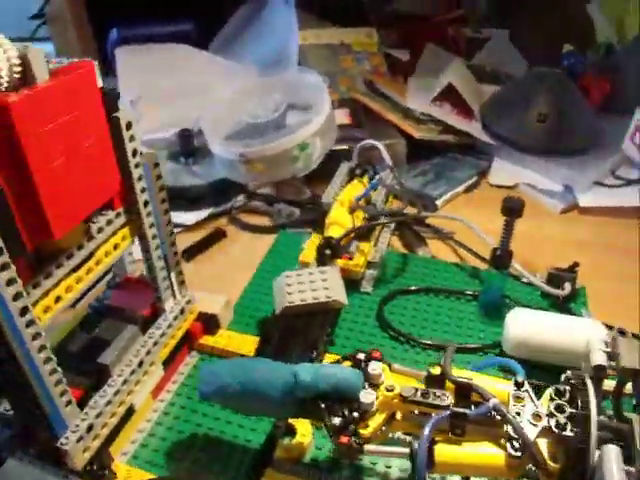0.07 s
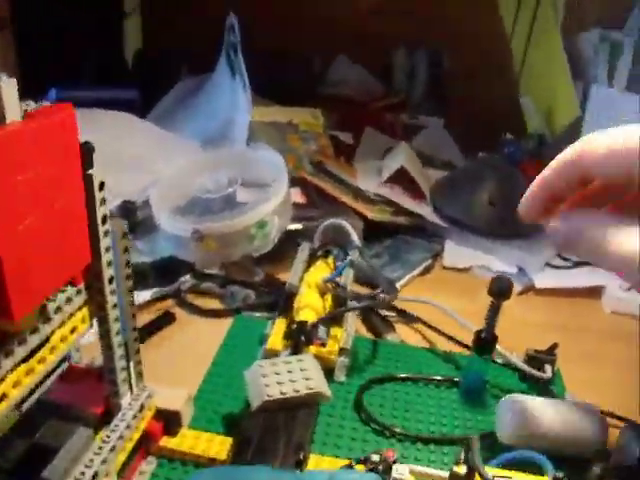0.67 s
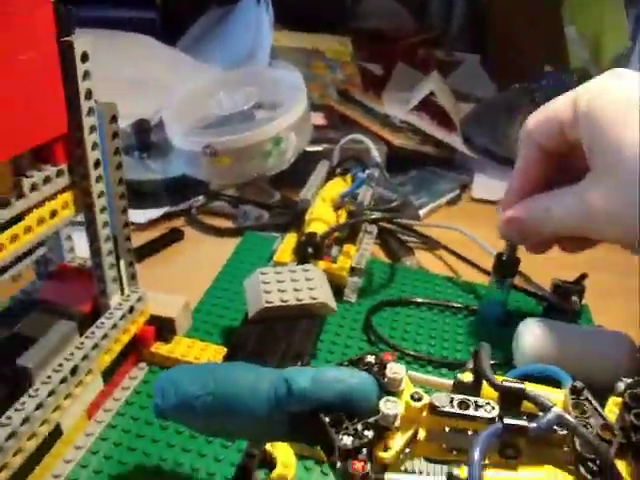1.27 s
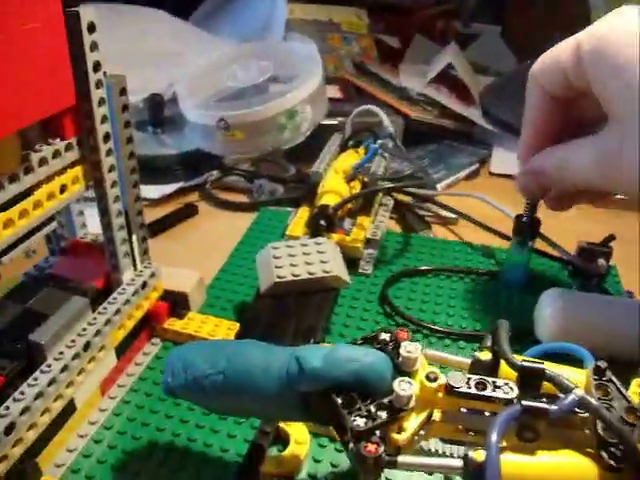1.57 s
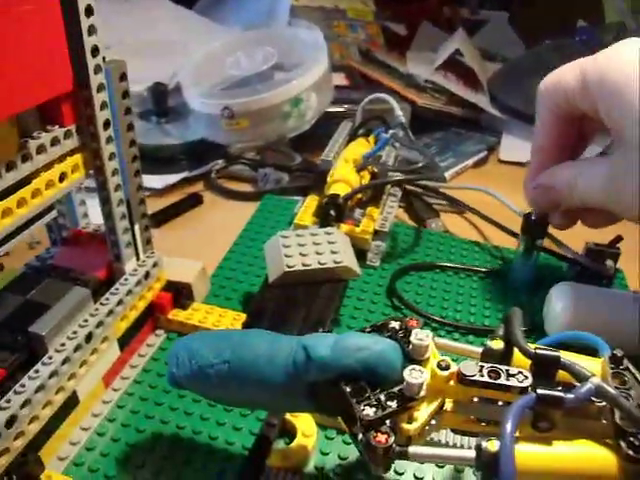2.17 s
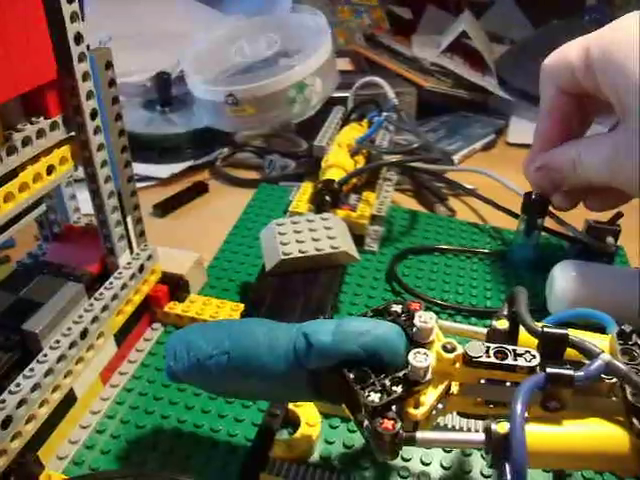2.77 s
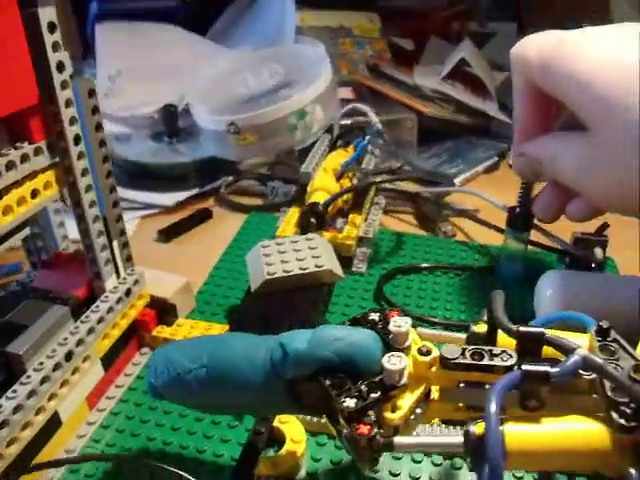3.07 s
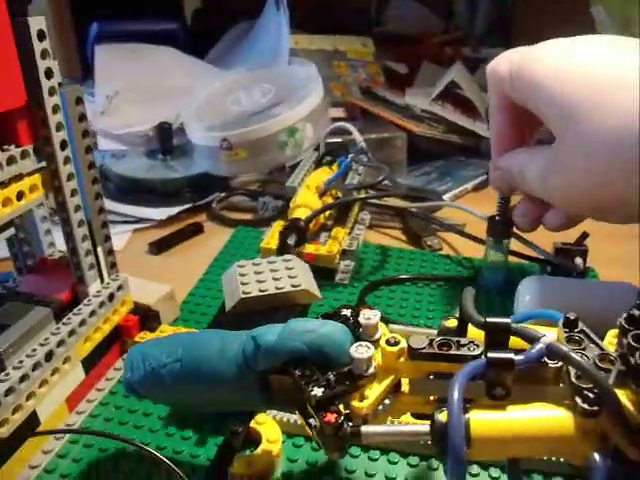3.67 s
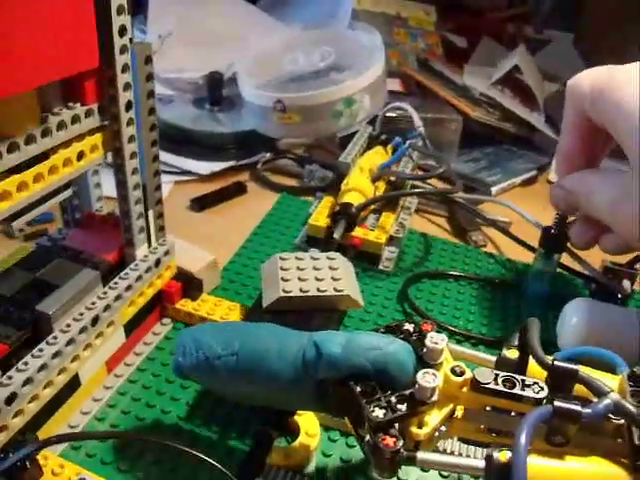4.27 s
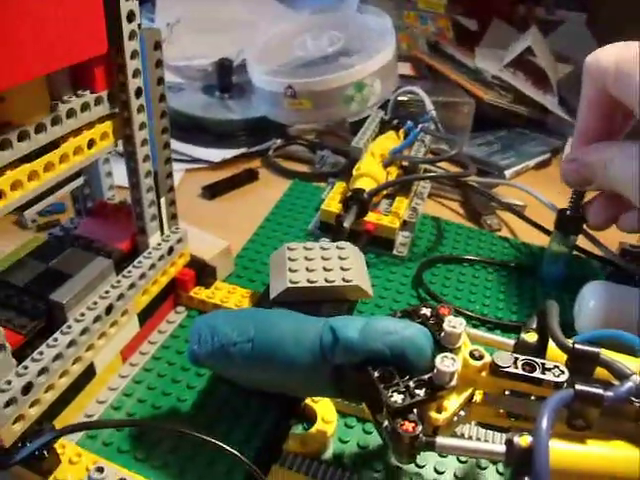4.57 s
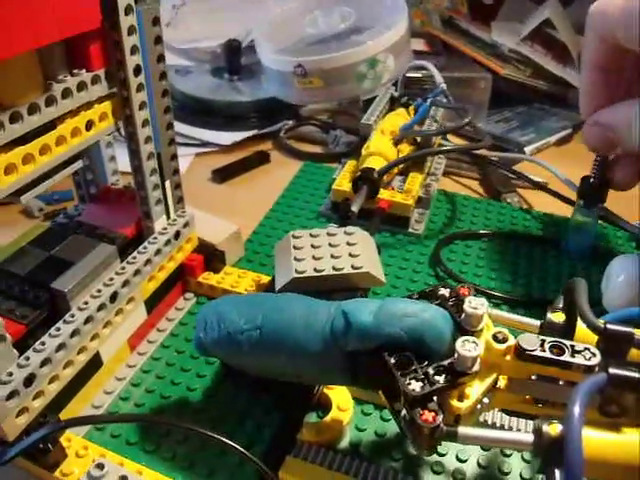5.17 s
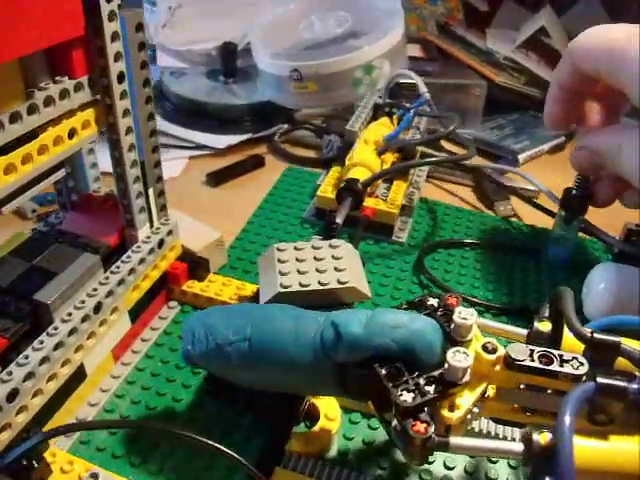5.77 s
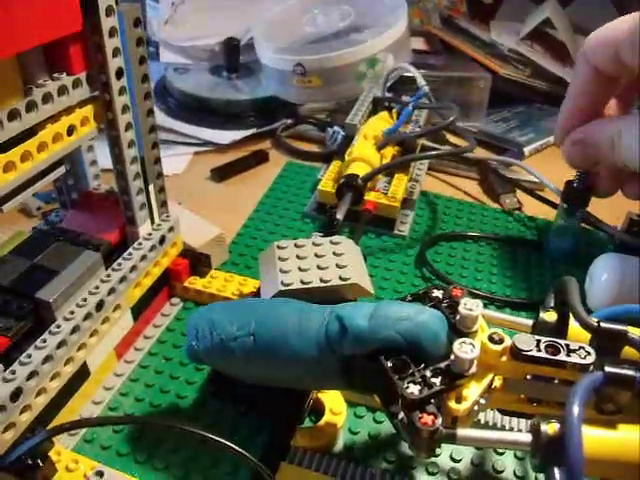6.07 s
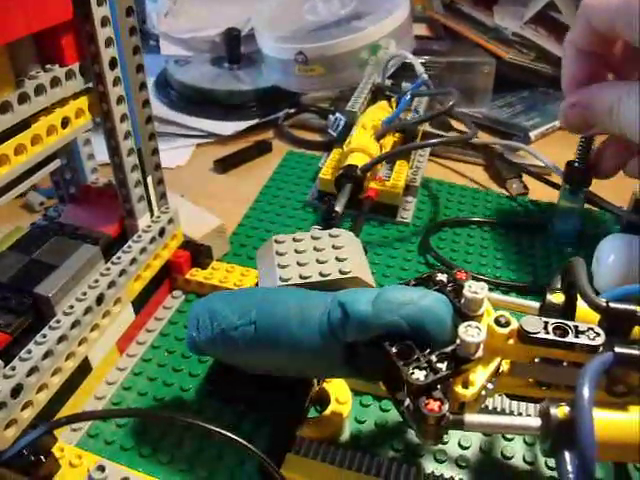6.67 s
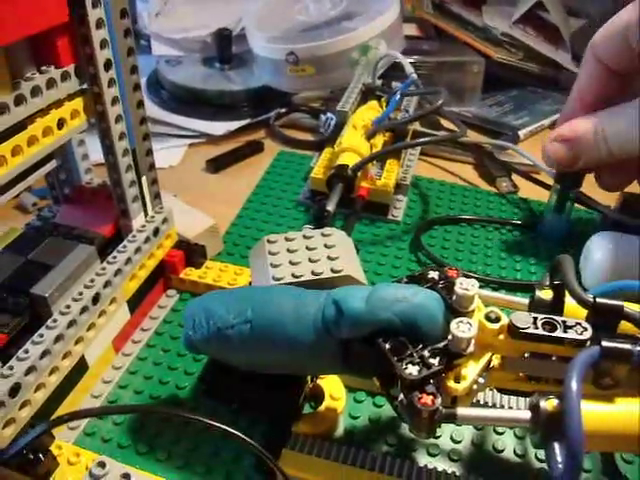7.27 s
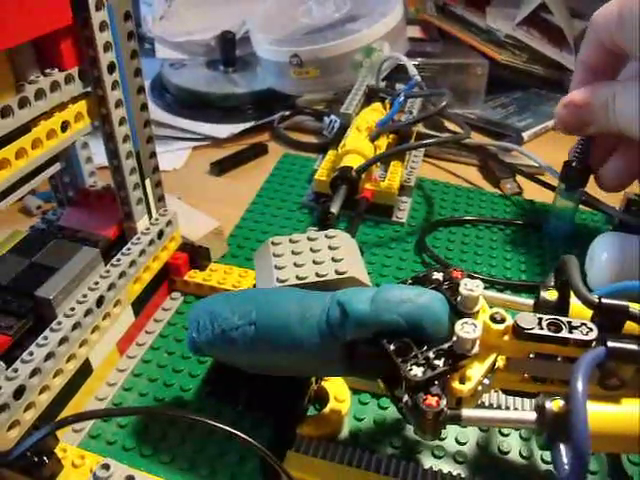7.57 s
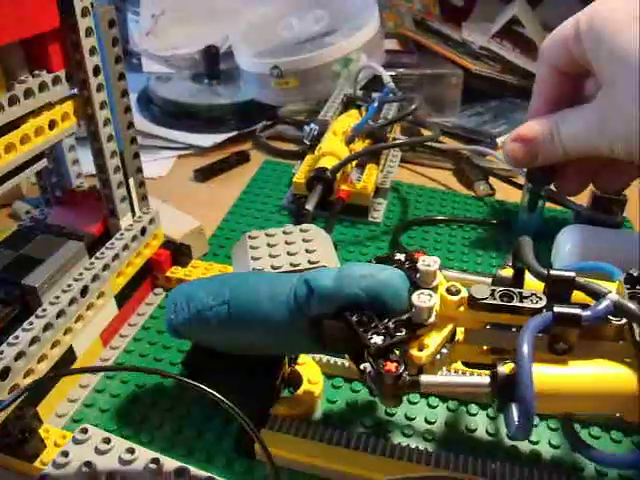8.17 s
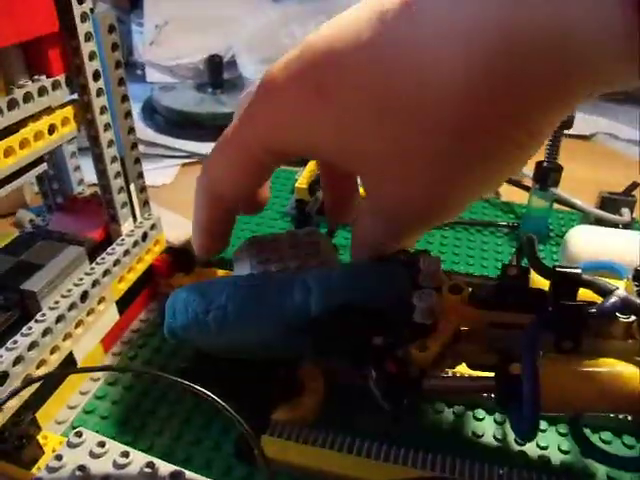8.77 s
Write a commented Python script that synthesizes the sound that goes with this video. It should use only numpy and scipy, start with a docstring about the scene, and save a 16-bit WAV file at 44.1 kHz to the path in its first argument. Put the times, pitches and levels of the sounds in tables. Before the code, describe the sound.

A small machine of plastic building blocks is worked on a desk, close to the microphone in a small room. It opens with a sharp click, lighter ticks and a tiny scrape. From about 1 to 2 seconds air seeps out very faintly. At 1.3 seconds a sliding seal gives the first of ten short, thin, high squeaks, each an almost pure tone that rises slightly and sags. They return about every 0.7 seconds, spacing out a little toward the last at 8 seconds, and are strongest near 2 and 4.7 seconds. At 3.2 seconds a part snaps over with a brief, loud clatter, by far the loudest event. Light lever and brick clicks and soft rubs are scattered throughout, with a last cluster near 8.9 seconds. A few low microphone bumps, steady dull hiss and faint mains hum sit underneath, and the treble is muted.

```python
"""Air-driven block machine on a desk

Small room, a narrow-band camera microphone near the desk. A hand rocks the lever of a machine of
plastic building blocks, and each stroke draws a thin stick-slip squeak from a sliding seal.
Lever and loose bricks click and rub, a little air seeps out, and once a part snaps over with a
loud clatter. Low bumps of the camera being handled, room hiss and mains hum lie behind it."""
import sys
import numpy as np
from scipy import signal
from scipy.fft import rfft, irfft
from scipy.io import wavfile

SR = 44100
rng = np.random.default_rng(int(sys.argv[2]) if len(sys.argv) > 2 else 0)


def waveform_to_disk(signal):
    """Save audio, clipped to [-1, 1], as 16-bit WAV at the path in sys.argv[1]."""
    frames = np.transpose(np.atleast_2d(signal))
    scaled = np.clip(frames, -1, 1) * 32767
    samples = np.round(scaled).astype(np.int16)
    wavfile.write(sys.argv[1], SR, samples)


N = 393372

# Seal strokes, foreground: start t/s, end t/s, time to crest t/s, crest f/Hz, climb to it f/Hz,
# sag after it/(Hz/s), crest level/dB, swell around the crest/dB
STROKES = [(1.283, 1.425, 0.071, 2046, 25, 4000, -34, 0),
           (1.947, 2.099, 0.051, 2067, 64.6, 2900, -23.5, 8.5),
           (2.682, 2.817, 0.037, 1953, 65, 1830, -34, 1.5), (3.334, 3.474, 0.043, 1970, 55, 1900, -30.5, 3),
           (3.971, 4.099, 0.05, 1958, 70, 2230, -34.5, 0.5),
           (4.682, 4.761, 0.051, 2170, 220, 6000, -25.5, 7.5),
           (5.433, 5.576, .062, 2005, 55, 2800, -30.5, 0.5),
           (6.164, 6.266, 0.063, 2024, 75, 1800, -36, -2.5),
           (7.173, 7.311, 0.057, 1993, 30, 2900, -33.5, 1.5),
           (7.981, 8.153, 0.094, 1971, 85, 750, -31.5, 5.5)]


def seal_squeaks(jitter=.005, flutter_db=.54, edge_s=.0038, grip_db=3, fade_db_per_hz=.042):
    """The seal sticks and slips in a near-pure tone that climbs to a crest, then sags and fades."""
    out = np.zeros(N)
    for start, end, crest_s, crest_hz, climb_hz, sag_hz_per_s, db, swell_db in STROKES:
        length = end - start
        t = np.arange(0, length, 1 / SR)
        climb_left = np.maximum(1 - t / crest_s, 0)
        sag_hz = sag_hz_per_s * np.maximum(t - crest_s, 0)
        hz = (crest_hz - climb_hz * climb_left - sag_hz) * (1 + jitter * wander(len(t), 64))
        phase = 2 * np.pi * np.cumsum(hz) / SR
        # the octave grows with use, 1 dB a second, and wavers as the grip comes and goes
        octave_db = -58.5 + start + grip_db * wander(len(t), 25)
        tone = gain_of(db) * np.sin(phase) + gain_of(octave_db) * np.sin(2 * phase)
        gate = np.clip(np.minimum(t, length - t) / edge_s, 0, 1)
        off_crest = np.minimum(abs(1 - t / crest_s), 1)
        shape_db = flutter_db * wander(len(t), 60) - swell_db * off_crest - fade_db_per_hz * sag_hz
        add(out, start, np.sqrt(2) * tone * gate * gain_of(shape_db))
    return out


# Blows of the part that snaps over: t/s, relative level/dB
PART_BLOWS = [(3.214, -13.5), (3.2178, -8.5), (3.2268, -8.5), (3.2352, -3.5), (3.2392, .5), (3.2519, -12),
              (3.2555, -7.5)]
# Its ring, a broad bark and a few lingering modes: f/Hz, width/Hz, relative level/dB
PART_MODES = [(120, 180, -7.5), (300, 670, -17.5), (980, 280, -29), (1610, 160, -4), (1760, 49, -1),
              (2410, 320, 7), (2260, 25, -7), (2540, 37, -13), (3820, 100, -28), (5000, 2100, -26.5),
              (2900, 23, -16), (1710, 36, -21)]


def clatter(energy_db=16.5, t60=.0086, rattle=.97, rebound_s=.0028, rebound_db=-10.5):
    """A stiff part snaps over and bounces; each blow rings the same modes and rebounds once."""
    out = np.zeros(N)
    for start, db in PART_BLOWS:
        for delay, drop_db in ((0, 0), (rebound_s, rebound_db)):
            add(out, start + delay, struck(contact(t60, rattle), PART_MODES, db + energy_db + drop_db))
    return out


# Lever and brick contacts: t/s, relative level/dB, hardness/0-1, the piece's own f/Hz, its share/dB
CONTACTS = [(0.0529, -16, 0.93, 4700, 4.5), (.074, -28.5, 0.96, 2700, 8), (0.135, -28, 0.04, 929, -8),
            (.157, -35, 0.03, 1000, 16), (0.3659, -27.5, 0.64, 1040, 3.5), (0.375, -30, 0.1, 1370, 2),
            (.4604, -34.5, 0.6, 2070, 12), (1.117, -16.5, 0.69, 2130, -7), (1.1844, -34, 0.66, 1770, 3.5),
            (1.5645, -25.5, 0.43, 1240, -3), (1.6196, -22.5, 0.49, 3360, 0), (1.844, -22.5, 0.29, 2260, 5),
            (1.8614, -24, 0.5, 1800, -8), (1.886, -24, 1, 4150, -8), (2.271, -33, 0.87, 1595, 12.5),
            (2.3166, -25.5, 0.54, 4150, -.5), (2.3408, -29, .45, 1530, 1),
            (3.0017, -36.5, 0.08, 1780, 11.5), (3.047, -34, 0.4, 2520, 5), (3.1794, -31, .35, 2370, 2.5),
            (3.9585, -33, 0.4, 2600, 7.5), (4.7623, -17.5, 0.21, 1730, 4), (5.3173, -22, 0.03, 1350, -0.5),
            (5.3377, -26, 0.24, 2100, 3.5), (5.8168, -16.5, .38, 1780, -6), (6.2609, -27, 0.07, 1710, 4),
            (6.3695, -35, 0.3, 1780, 10), (6.5939, -30.5, 0.32, 2290, 4), (6.6018, -26, 0.37, 1550, 1.5),
            (6.975, -22.5, 0.6, 2500, 3), (7.3986, -37, .1, 2010, 9.5), (7.5955, -29.5, .6, 2330, 5),
            (8.1455, -28.5, .1, 1900, 3.5), (8.867, -31, 0.44, 2170, 9.5), (8.8843, -28.5, 0.47, 2010, 6),
            (8.893, -26.5, 0.55, 2600, 6)]
# Modes of the bricks, the base plate on the desk and the hard edges: f/Hz, width/Hz, relative level/dB
BRICK_MODES = [(1177, 370, 0.5), (1686, 230, 4.5), (1900, 180, 0.5), (2330, 440, 1.5), (2800, 220, 1),
               (3220, 150, -1)]
BASE_MODES = [(110, 26, -8), (178, 80, -1.5), (356, 80, 1.5), (553, 180, -6), (840, 240, -10.5),
              (1113, 134, 2.5)]
EDGE_MODES = [(4000, 600, -2.5), (4700, 350, 3.5), (4950, 710, -3.5)]


def clicks(bricks_db=17, piece_db=14, piece_width_hz=150, rattle=1.1):
    """A contact rings the piece and nearby bricks; soft ones thud the base, hard ones tick the edges."""
    out = np.zeros(N)
    for start, db, hardness, hz, own_db in CONTACTS:
        thud_db = np.interp(hardness, [0, 1], [22, -3.5])
        tick_db = np.interp(hardness, [0, 1], [-10, 20])
        t60 = np.interp(hardness, [0, 1], [.034, .018])
        push = contact(t60, rattle)
        piece_mode = [(hz, piece_width_hz, 0)]
        for modes, share_db in ((BRICK_MODES, bricks_db), (BASE_MODES, thud_db),
                                (EDGE_MODES, tick_db), (piece_mode, piece_db + own_db)):
            add(out, start, struck(push, modes, db + share_db))
    return out


# Handling noise, low bumps of the camera being handled, and fingers and plastic rubbing on the machine:
# t/s, length/s, level/dB, centre f/Hz
BUMPS_AND_RUBS = [(.055, 0.024, -25, 2800), (.056, 0.024, -34.5, 504), (.114, 0.032, -38, 148.8),
                  (0.291, 0.037, -43, 110), (0.165, 0.11, -47.5, 970), (1.131, 0.22, -46.5, 208),
                  (1.526, 0.14, -45, 1900), (1.819, 0.081, -44, 300), (2.234, 0.1, -46.5, 1850),
                  (2.947, 0.16, -47, 2000), (5.306, .048, -40.5, 714), (5.728, .13, -42.5, 1980),
                  (5.79, .05, -41, 160), (8.321, 0.052, -46, 1770), (8.863, 0.053, -36, 2100)]


def handling_noise(grain_db=4, q=1.82):
    """Low camera bumps and rubs on the machine: each is brief grainy noise in one broad resonance."""
    out = np.zeros(N)
    for start, length, db, hz in BUMPS_AND_RUBS:
        size = round(length * SR)
        grains = rng.standard_normal(size) * gain_of(grain_db * wander(size, 250))
        body = [(hz, hz / q, 0)]
        add(out, start, swelled(ring(ring(grains, body), body), db))
    return out


def catches(per_s=14, energy_db=-15.5, t60=.028, rattle=1.5):
    """The bricks catch with a faint tap at random moments of the longer handling noises."""
    out = np.zeros(N)
    for start, length, _, _ in BUMPS_AND_RUBS:
        for fraction in rng.random(int(length * per_s)):
            add(out, start + fraction * length, struck(contact(t60, rattle), BRICK_MODES, energy_db))
    return out


# One quick slide: t/s, length/s, first f/Hz, last f/Hz, level/dB
SLIDE = [(.370, .034, 1900, 4600, -40.5)]


def scrape(roughness=.12):
    """Plastic slides faster and faster: a rough rising chirp."""
    start, length, first_hz, last_hz, db = SLIDE[0]
    size, out = round(length * SR), np.zeros(N)
    hz = np.linspace(first_hz, last_hz, size) * (1 + roughness * wander(size, 900))
    add(out, start, swelled(np.sin(2 * np.pi * np.cumsum(hz) / SR), db))
    return out


def air_leak(start_s=.94, length_s=1.1, db=-55.5, hz=3690, width_hz=450):
    """Air seeps through a narrow gap with a faint, thin hiss."""
    out = np.zeros(N)
    gap = [(hz, width_hz, 0)]
    flow = rng.standard_normal(round(length_s * SR))
    add(out, start_s, swelled(ring(ring(flow, gap), gap), db))
    return out


# Near echoes off the desk and its clutter: delay t/s, level/dB
DESK_ECHOES = [(.0031, -23), (.0074, -21), (.0135, -19)]
# Decay of the small room: f/Hz, t60/s
ROOM_DECAY = [(200, 0.21), (1000, 0.11), (2500, 0.11), (6000, 0.094)]


def room(x, wet_db=-15):
    """The direct sound reaches the microphone with a few near reflections and a short diffuse tail."""
    size = SR // 2
    reflections = rng.standard_normal(size) * (rng.random(size) < .1)
    reflections *= np.arange(size) > SR * .005  # the tail starts 5 ms late
    hz, t, spectrum = signal.stft(reflections, SR, nperseg=256)
    decay = gain_of(-60 * t / read(ROOM_DECAY, hz)[:, None])
    tail = signal.istft(spectrum * decay, SR, nperseg=256)[1]
    response = gain_of(wet_db) * tail / np.linalg.norm(tail)
    for delay, db in DESK_ECHOES:
        response[round(delay * SR)] += gain_of(db)
    return x + signal.fftconvolve(x, response)[:N]


# Room tone behind the machine: f/Hz, relative level/dB
HISS_SPECTRUM = [(20, -3), (35, -11), (70, -11.5), (140, -13), (340, -14.5), (700, -18), (1400, -20.5),
                 (2000, -20.5), (3000, -23.5), (4000, -24.5), (5100, -26), (5450, -39), (6000, -47.5),
                 (6400, -82.5)]


def room_hiss(db=-43):
    """The steady, dull hiss of the room."""
    colour = gain_of(read(HISS_SPECTRUM, np.fft.rfftfreq(N, 1 / SR)))
    noise = irfft(rfft(rng.standard_normal(N)) * colour, N)
    return unit_rms(noise) * gain_of(db)


# Hum, changing as the microphone moves about: t/s, level/dB
HUM_LEVELS = [(0.0, -40.5), (0.2, -52.5), (0.6, -42.5), (1.9, -39.5), (3.7, -44), (4.4, -42), (7.7, -40.5),
              (8.92, -47.5)]


def mains_hum(hz=50, octave_db=-17):
    """The mains hums with a weak octave, slowly swelling and sinking."""
    t = np.arange(N) / SR
    phase = 2 * np.pi * hz * t
    gain = gain_of(np.interp(t, *np.transpose(HUM_LEVELS)))
    return np.sqrt(2) * gain * (np.sin(phase) + gain_of(octave_db) * np.sin(2 * phase))


def contact(t60, rattle, rise_s=.00098):
    """One push, then a chatter of tiny contacts that builds as the pieces seat and dies away."""
    t = np.arange(SR // 6) / SR
    chatter = rng.standard_normal(len(t)) * (1 - np.exp(-t / rise_s))
    chatter *= gain_of(-60 * t / t60)
    return (t == 0) + rattle * chatter / np.linalg.norm(chatter)


def ring(x, modes):
    """Passes x through parallel damped resonances of alternating sign."""
    return sum((-1) ** k * gain_of(db) * signal.lfilter(*signal.iirpeak(hz, hz / width, SR), x)
               for k, (hz, width, db) in enumerate(modes))


def struck(push, modes, energy_db):
    """The ring of a set of modes after a push, scaled to a given energy."""
    sound = ring(push, modes)
    return gain_of(energy_db) * sound / np.linalg.norm(sound)


def swelled(x, db):
    """Fades a sound in, holds it at a level and fades it out."""
    return gain_of(db) * unit_rms(x) * signal.windows.tukey(len(x), .5)


def wander(size, rate_hz):
    """Smooth random drift of rms 1, rolling off above the rate."""
    hz = np.fft.rfftfreq(size, 1 / SR)
    lowpass = np.exp(-(hz / rate_hz) ** 2) * (hz > 0)
    return unit_rms(irfft(rfft(rng.standard_normal(size)) * lowpass, size))


def gain_of(db):
    """Decibels to a factor."""
    return 10 ** (np.asarray(db) / 20)


def unit_rms(x):
    """Scales to rms 1."""
    return x / np.sqrt(np.mean(x ** 2) + 1e-20)


def read(points, hz):
    """Interpolates a table on a log-frequency axis."""
    f, value = np.transpose(points)
    return np.interp(np.log(hz + 1), np.log(f + 1), value)


def add(mix, start_s, sound):
    """Mixes a sound in at its start time."""
    part = mix[max(round(start_s * SR), 0):][:len(sound)]
    part += sound[:len(part)]


def scene():
    """The machine and handling noise in the room, over hiss and hum."""
    near = room(seal_squeaks() + clicks() + clatter() + handling_noise()
                + catches() + scrape() + air_leak())
    # the microphone loses the top treble
    near = signal.sosfilt(signal.butter(N=12, Wn=5400, fs=SR, output="sos"), near)
    return (near + room_hiss() + mains_hum())[None]


def record(dry, ceiling=.98, cutoff_hz=6450):
    """Peaks beyond the ceiling are clipped flat, then the band is limited."""
    lowpass = signal.firwin(511, cutoff_hz, window=("kaiser", 9), fs=SR)
    return signal.oaconvolve(np.clip(dry, -ceiling, ceiling), lowpass[None], "same")


dry = scene()
out = record(dry)
waveform_to_disk(out)
```